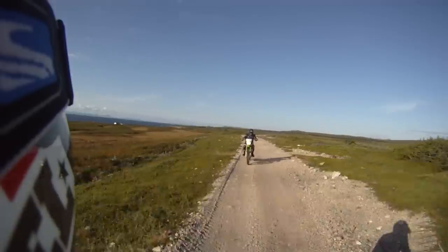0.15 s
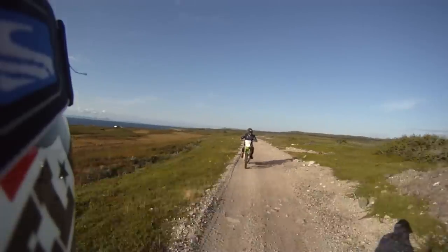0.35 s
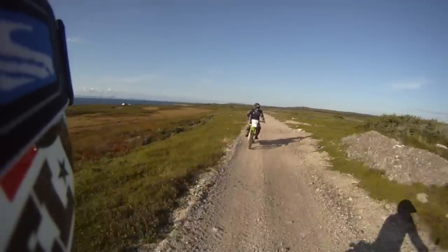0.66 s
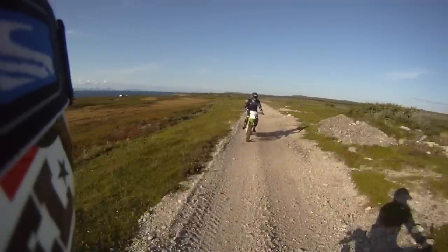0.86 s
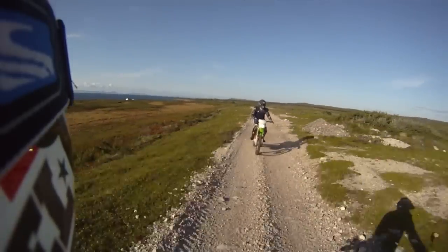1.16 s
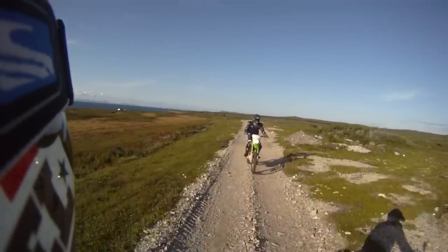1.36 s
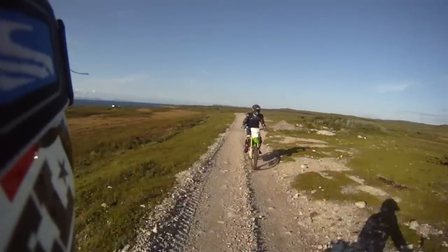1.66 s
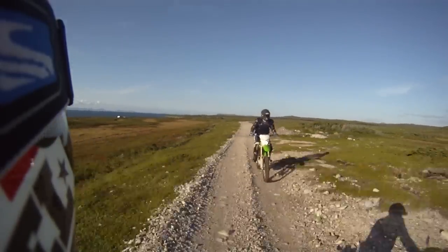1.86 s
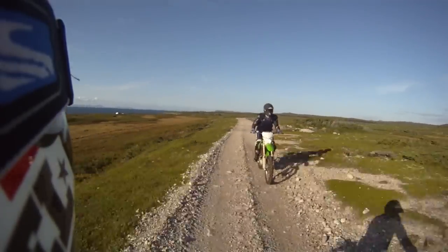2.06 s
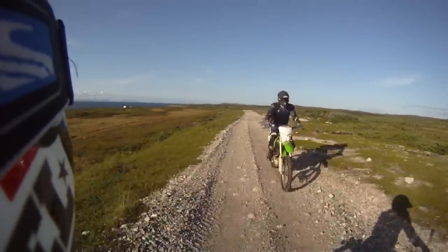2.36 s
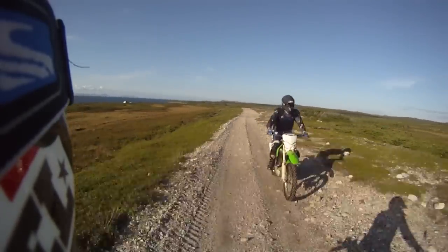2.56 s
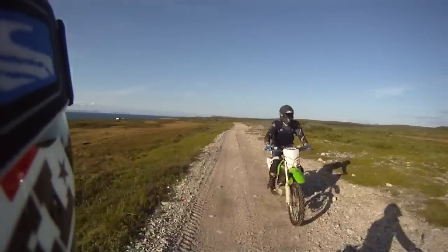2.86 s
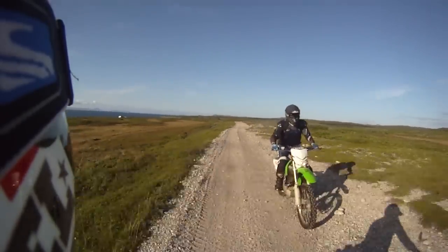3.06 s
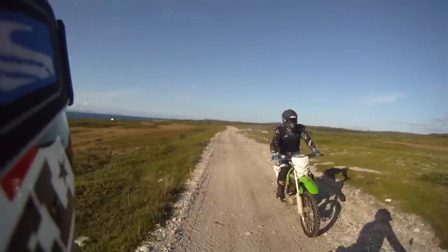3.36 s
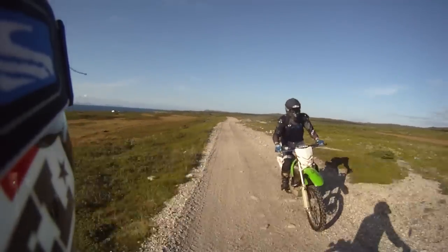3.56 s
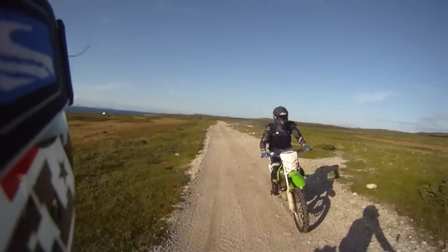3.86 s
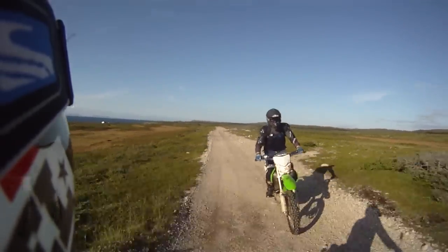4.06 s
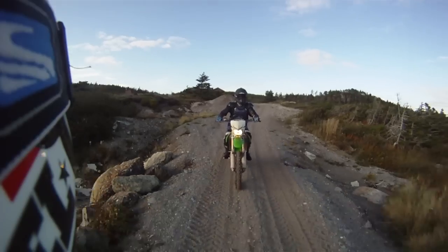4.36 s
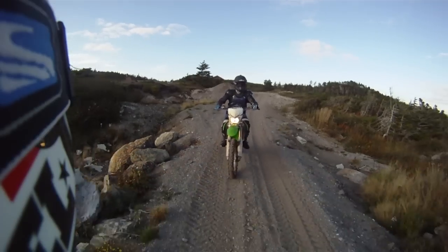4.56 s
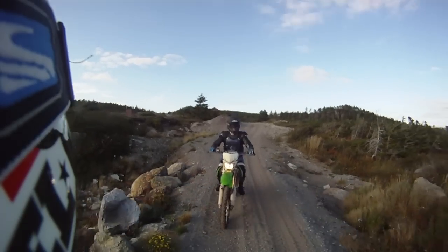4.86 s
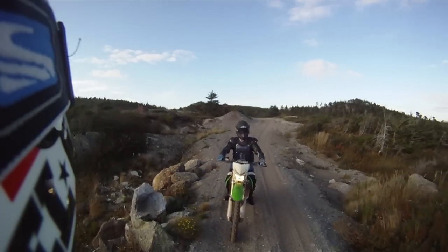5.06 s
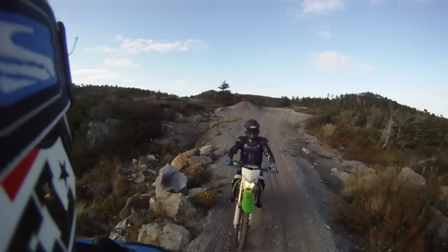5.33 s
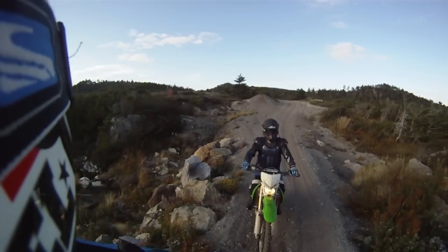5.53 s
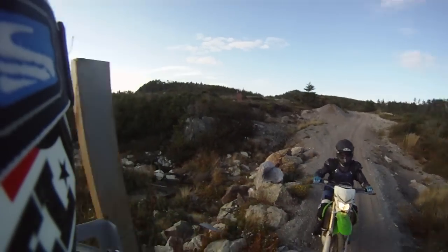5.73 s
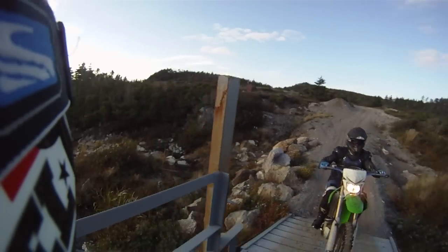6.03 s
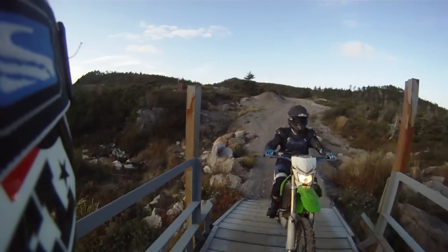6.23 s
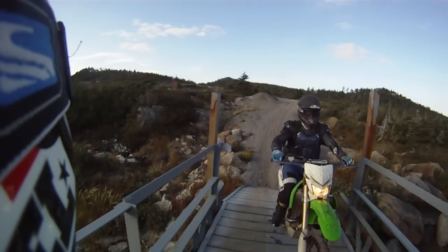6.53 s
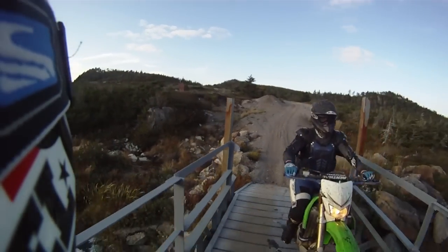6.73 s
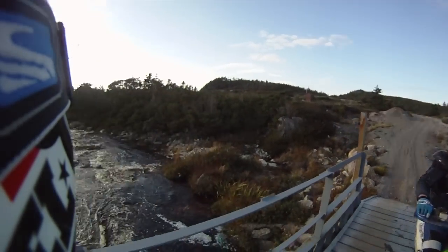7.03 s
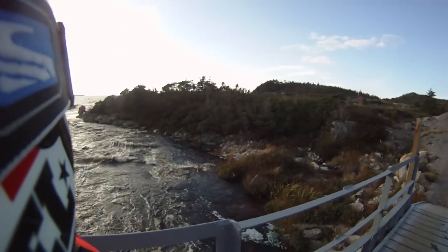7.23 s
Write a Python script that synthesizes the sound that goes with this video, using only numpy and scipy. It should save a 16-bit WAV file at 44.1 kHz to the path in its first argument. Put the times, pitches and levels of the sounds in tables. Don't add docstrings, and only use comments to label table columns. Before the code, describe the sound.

Outdoors, from a camera on a rider's helmet in a sealed plastic housing. Loud lumpy wind, hiss and low buffeting cover a steady blurred dirt bike drone for four seconds, fading to a brief silence. Then a much quieter slow ride fades in: separate exhaust thumps, metallic ticks, light gravel knocks, then throttle blips and sharp clattering knocks on a plank bridge.

```python
import sys
import numpy as np
from scipy import signal
from scipy.fft import rfft, irfft, next_fast_len
from scipy.io import wavfile
from scipy.ndimage import uniform_filter1d

SR = 44100
rng = np.random.default_rng(int(sys.argv[2]) if len(sys.argv) > 2 else 0)


def nominal_scale(level):
    x = np.asarray(level, float) / 20
    return 10 ** x


def inscribe(sig):
    pcm = np.round(np.clip(np.atleast_2d(sig).T, -1, 1) * 32767)
    wavfile.write(sys.argv[1], SR, pcm.astype(np.int16))


N = 325898
T = np.arange(N) / SR
CUT = 4.162
PLANKS_S = (5.54, 5.8)


def evened(x):
    return x / np.sqrt(np.mean(x ** 2) + 1e-20)


def curves(rows):
    s, *columns = np.transpose(rows)
    return [np.interp(T, s, c) for c in columns]


def held(rows, settle_s=0.028):
    s, *columns = np.transpose(rows)
    row = np.maximum(np.searchsorted(s, T) - 1, 0)
    return [uniform_filter1d(c[row], round(settle_s * SR)) for c in columns]


def spell(start, length, rise, fall):
    opening = (T - start) / rise + 0.5
    closing = (start + length - T) / fall + 0.5
    return np.clip(np.minimum(opening, closing), 0, 1)


def dying(x, decay_s):
    return signal.lfilter([1], [1, -np.exp(-1 / (decay_s * SR))], x)


def ring(x, hz, width):
    radius = np.exp(-np.pi * width / SR)
    angle = 2 * np.pi * hz / SR
    return signal.lfilter([0.5, 0, -0.5], [1, -2 * radius * np.cos(angle), radius ** 2], x)


def drift(per_s, count=64):
    coarse = rng.standard_normal(N // count + 2)
    coarse = uniform_filter1d(coarse, max(int(SR / count / per_s / 4), 1))
    coarse = evened(signal.lfilter([1], [1, -np.exp(-2 * np.pi * per_s * count / SR)], coarse))
    return np.interp(np.arange(N) / count, np.arange(len(coarse)), coarse)


def coloured(x, points, peaks=()):
    size = next_fast_len(N)
    hz = np.fft.rfftfreq(size, 1 / SR)
    f, db = np.transpose(points)
    gain = nominal_scale(np.interp(np.log(hz + 1), np.log(f), db)) * (hz > f[0]) * (hz < f[-1])
    for centre, width, over_db in peaks:
        gain = gain * nominal_scale(over_db / (1 + (2 * (hz - centre) / width) ** 2))
    droop = np.sinc(np.minimum(hz, 6000) / 12000)
    return evened(irfft(rfft(x, size) * gain / droop, size)[:N])


# time in seconds, firings per second.
FAST_FIRINGS = [(0.0, 47.8), (0.6, 47.5), (0.9, 45.9), (1.5, 45.8), (1.8, 44.9), (2.4, 45.7), (2.7, 45.4),
                (3.0, 43.6), (4.16, 42.9)]
# multiple of the firing rate, level in dB against the low wind.
DRONE_ORDERS = [(2, -8), (3, -14), (4, -10.5), (5, -13.5), (6, -13), (7, -25.5), (9, -22), (11, -17)]


def drone():
    turns = np.cumsum(curves(FAST_FIRINGS)[0]) / SR + 0.014 * drift(5.1)
    out = np.zeros(N)
    for order, db in DRONE_ORDERS:
        tone = np.cos(2 * np.pi * (order * turns + rng.random()))
        out += nominal_scale(db + 3.5 * drift(3.1)) * np.sqrt(2) * tone
    return out


# frequency in Hz, level in dB per Hz.
WIND_COLOUR = [(32, -52), (55, -3), (65, -0.5), (91, -2), (118, 0), (276, -9), (376, -15), (480, -16.5),
               (620, -26), (1060, -120)]


def wind(db, gust_db):
    return nominal_scale(db) * coloured(rng.standard_normal(N) * nominal_scale(gust_db * drift(19.0)), WIND_COLOUR)


# frequency in Hz, width in Hz, height in dB over the hiss
# on the fast ride, the same on the slow ride, level in dB when knocked.
HOUSING_MODES = [(740, 110, 5, 2.1, 7), (1007, 23, 2.5, 1.4, -2.5), (1280, 83, 5.5, 4.1, 7.5),
                 (1830, 320, 0, 1.7, 15.5), (2196, 39, -2.5, 2, 3.5), (2126, 200, 6, 4.5, -53),
                 (2382, 158, 6.5, 2.5, -38), (2910, 150, 1.5, 3.4, -3), (3640, 110, 3.5, 5.1, -46)]


def housing_hiss(db, colour, column, throb, gust_db, patch_db, grit):
    stones = (rng.random(N) < 40 / SR) * nominal_scale(5.2 * np.minimum(rng.exponential(1, N), 3))
    shakes = grit * dying(stones, 0.002)
    drive = rng.standard_normal(N) * nominal_scale(gust_db * (drift(6.8) + drift(60))) * (1 + throb + shakes)
    z = signal.stft(drive, nperseg=256)[2]
    patches = uniform_filter1d(rng.standard_normal(z.shape), 3, 0)
    patches = evened(uniform_filter1d(patches, 8, 1))
    drive = signal.istft(z * nominal_scale(patch_db * patches), nperseg=256)[1][:N]
    return nominal_scale(db) * coloured(drive, colour, [(row[0], row[1], row[column]) for row in HOUSING_MODES])


# frequency in Hz, level in dB per Hz.
FAST_HISS_COLOUR = [(240, -5.5), (400, -10.5), (581, -8.5), (713, -1.5), (845, -6.5), (1000, -3.5),
                    (1130, -6.5), (1290, -7), (1670, -7), (2140, -3), (2810, -12.5), (3690, -11),
                    (4220, -19), (5240, -21), (6000, -26), (7800, -72), (13200, -120)]
# time in seconds, hiss level in dB, turn of the head in dB under 1.4 kHz.
HEAD_AIRFLOW = [(0.0, -16, .5), (0.3, -22.5, .5), (0.6, -20, -2), (0.8, -19.5, 2.5), (1.4, -22.5, 2),
                (1.7, -22.5, -0.9), (2.2, -22.5, -0.5), (2.55, -20, 1), (2.95, -22.5, 0.6),
                (3.25, -22.5, -2.2), (4.1, -24, -1.5)]
# start in seconds, length in seconds, low wind up in dB, hiss up in dB.
FAST_GUSTS = [(0.0, 0.11, 3, -2.5), (0.17, 0.19, 4, -0.7), (0.333, .07, -2, 3), (0.46, 0.054, 7, 1.3),
              (0.586, 0.044, 2, .6), (0.717, 0.084, 6, 1), (0.88, 0.055, 4.5, .6), (1.0, 0.29, 2, 0.65),
              (1.209, 0.064, 8, 0), (1.295, 0.036, 7, 5), (1.413, .12, 6.5, 3), (1.623, 0.034, 3, 1),
              (1.818, 0.16, 3, 1.5), (2.236, 0.056, 3.5, 0.2), (2.416, 0.031, 10, 4.5),
              (2.568, 0.24, 3.5, 1.1), (2.862, 0.2, 4, 3.5), (3.034, 0.28, 2.5, 2.5), (3.354, 0.13, 2, 2.5)]


def fast_ride():
    air_db, dark_db = curves(HEAD_AIRFLOW)
    low_up_db, hiss_up_db = sum(np.outer(up_db, spell(s, length, rise=0.016, fall=0.15))
                                for s, length, *up_db in FAST_GUSTS)
    usual_db = air_db.mean()
    wind_db = usual_db + 0.42 * (air_db - usual_db) - 6.5 + low_up_db
    low = nominal_scale(uniform_filter1d(wind_db, 12000)) * drone() + wind(wind_db - 0.5, gust_db=-1.5)
    hiss = housing_hiss(air_db + hiss_up_db, FAST_HISS_COLOUR, column=2, throb=0,
                        gust_db=0.66, patch_db=0.5, grit=0.052)
    dark = signal.sosfiltfilt(signal.butter(2, 1400, fs=SR, output="sos"), hiss)
    return low + hiss + (nominal_scale(dark_db) - 1) * dark


# start in seconds, length in seconds, level in dB,
# pitch in Hz.
HELMET_SHAKES = [(0.05, 0.18, -21.5, 40.77), (0.275, 0.11, -22.5, 35), (0.4, 0.3, -23, 33.4),
                 (0.847, 0.25, -28, 35.5), (1.19, 0.065, -24, 36.1), (1.298, 0.3, -27, 36.86),
                 (1.665, 0.04, -20, 36.75), (1.796, 0.053, -19, 37.45), (1.904, 0.16, -23, 38.5),
                 (2.203, 0.26, -28, 40.76), (2.496, 0.25, -26.5, 44), (2.82, 0.18, -22.5, 39.6),
                 (3.03, 0.24, -28, 40.57), (3.278, 0.32, -26.5, 36.66), (3.64, 0.33, -25.5, 38.05),
                 (4.0, 0.46, -34.5, 42.1), (4.42, 0.32, -33, 38.6), (4.81, 0.15, -38, 40.3),
                 (4.96, 0.12, -32.5, 40.8), (5.13, 0.22, -29.5, 36.6), (5.34, .18, -38, 37.6),
                 (5.61, 0.135, -35, 37.4), (5.764, 0.25, -34, 40.6), (6.1, .18, -42, 39.9),
                 (6.393, .2, -46, 36), (6.65, 0.126, -39, 46.5), (6.807, 0.28, -40, 40.2),
                 (7.198, 0.24, -40, 40)]


def buffet(wobble=0.12, lumps_db=1.8):
    size = nominal_scale(np.where(T < CUT, -46, -56))
    for s, length, db, _ in HELMET_SHAKES:
        size = size + nominal_scale(db) * spell(s, length, rise=0.019, fall=0.044)
    hz = curves([(s + length / 2, f) for s, length, _, f in HELMET_SHAKES])[0]
    turns = np.cumsum(hz * (1 + wobble * drift(12.8))) / SR
    return np.sqrt(2) * size * nominal_scale(lumps_db * drift(20) - 3.3) * np.sin(2 * np.pi * turns)


# time in seconds, firings per second.
SLOW_FIRINGS = [(4.162, 24.71), (4.5, 25.86), (4.9, 26.02), (5.0, 19.64), (5.3, 17.24), (5.7, 19.15),
                (5.87, 18.85), (6.1, 28.32), (6.22, 27.5), (6.32, 32.91), (6.5, 24.47), (6.66, 22.32),
                (6.76, 26.73), (6.88, 29.81), (7.1, 26.67), (7.39, 32.35)]


def firings(start, uneven_db):
    per_s = curves(SLOW_FIRINGS)[0]
    turns = start + np.cumsum(per_s * (T > CUT)) / SR + 0.008 * drift(20)
    clicks = np.diff(np.maximum.accumulate(np.floor(turns)), prepend=0)
    return clicks * nominal_scale(uneven_db * rng.standard_normal(N)) / np.sqrt(per_s), turns


# frequency in Hz, width in Hz, level in dB.
SILENCER_MODES = [
    (101.7, 54, 17),
    (144, 48, -5),
]
# frequency in Hz, width in Hz, level in dB.
PIPE_END_MODES = [
    (260, 170, 0),
    (480, 150, -5),
]


def exhaust(clicks, thump_db, bark_db, throttle, lag_s=0.0066, first=0.3):
    lower, upper = [nominal_scale(db) * ring(ring(clicks, hz, width), hz, width) for hz, width, db in SILENCER_MODES]
    thump = lower + upper * nominal_scale(np.interp(throttle, [0, 1], (-16, 12)))
    snap = signal.oaconvolve(clicks, signal.windows.hann(91))[:N]
    snap = first * snap + np.roll(snap, round(lag_s * SR))
    bark = sum(nominal_scale(db + 1.1 * drift(11)) * evened(ring(snap, hz, width)) for hz, width, db in PIPE_END_MODES)
    later = T > CUT
    return -nominal_scale(thump_db) * thump / np.std(thump[later]) - nominal_scale(bark_db) * bark / np.std(bark[later])


def pipe_hum(turns, load_db, throttle):
    pipe_hz, width_hz = 110, 69
    off_pipe = np.minimum(((4 * curves(SLOW_FIRINGS)[0] - pipe_hz) / width_hz) ** 2, 1)
    db = load_db - 9.5 - 3.5 * throttle - 24 * off_pipe + np.interp(T, PLANKS_S, [-6, 0])
    return nominal_scale(db + 0.5) * np.sqrt(2) * np.cos(2 * np.pi * (4 * turns - 0.52))


# frequency in Hz, width in Hz, level in dB.
VALVE_MODES = [
    (2940, 150, 1.5),
    (2200, 246, 4),
    (3460, 300, -12),
]


def valve_ticks(clicks):
    burst = dying(clicks * nominal_scale(2.5 * drift(20)), 0.01) * rng.standard_normal(N)
    sound = sum(nominal_scale(db) * ring(burst, hz, width) for hz, width, db in VALVE_MODES)
    return nominal_scale(-53.5) * evened(sound) * spell(CUT, 4.95 - CUT, rise=0.01, fall=0.17)


# time in seconds, peak in dB, loudest ring in Hz, shake in seconds.
WHEEL_KNOCKS = [(4.7411, -29, 2290, 0.009), (4.7785, -31, 764, 0.009), (4.8429, -27, 1240, 0.0072),
                (4.9344, -30, 996, 0.02), (5.5832, -27, 2050, 0.014), (5.6765, -24, 1270, 0.0067),
                (5.7618, -20, 1280, 0.0067), (5.8456, -29, 2770, 0.009), (6.0072, -16, 1920, 0.0067),
                (6.0901, -11, 2280, 0.0064), (6.1034, -15, 1290, 0.0049), (6.1355, -19, 1270, 0.017),
                (6.1729, -19, 1280, 0.02), (6.4123, -20, 2040, 0.015), (6.552, -19.5, 1260, 0.0068),
                (6.6049, -7, 1830, 0.0085), (6.6164, -16, 2180, 0.0079), (6.628, -20, 2210, 0.013),
                (6.6494, -28, 2240, 0.0074), (6.771, -26, 2970, 0.0058), (6.8084, -22, 740, 0.013),
                (6.8444, -27, 600, 0.0083), (6.8942, -17, 1130, 0.025), (6.9686, -19, 2100, 0.021),
                (7.0174, -26, 1310, 0.009), (7.1272, -40, 1300, 0.009), (7.3372, -18.5, 1220, 0.0082)]


def knocks(favour_db=9, trim_db=-3, dull_hz=2700):
    out, t = np.zeros(N + 5000), np.arange(5000) / SR
    padding = signal.butter(2, dull_hz, fs=SR)
    for s, db, loudest_hz, shake in WHEEL_KNOCKS:
        noise = np.where(t < 0.0003, 2.5, rng.standard_normal(5000))
        envelope = np.exp(-t / max(shake, 0.001)) * np.minimum(t / 0.00047, 1)
        jolt = signal.lfilter(*padding, noise * envelope)
        sound = np.zeros(5000)
        for hz, width, _, _, knock_db in HOUSING_MODES:
            nearness_db = favour_db / (1 + ((hz - loudest_hz) / 120) ** 2)
            sound += nominal_scale(knock_db + nearness_db) * ring(jolt, hz, width)
        out[round(s * SR):][:5000] += nominal_scale(db + trim_db) * sound / abs(sound).max()
    return out[:N]


# time in seconds, peak in dB, pitch in Hz.
FRAME_BOOMS = [(4.774, -27, 320), (4.855, -26, 330), (4.895, -31, 326), (5.581, -30, 175), (5.68, -34, 175),
               (5.684, -35, 330), (6.14, -28, 327), (6.172, -37, 300), (6.605, -29, 397), (6.61, -27, 200),
               (6.772, -25, 246), (6.809, -24, 270), (6.843, -24.5, 280), (6.773, -28.5, 2970),
               (5.846, -34, 2770), (6.615, -26, 725), (6.092, -33, 563), (6.975, -33, 340)]


def booms(rise_s=0.002, ring_s=0.011):
    out, t = np.zeros(N + 4000), np.arange(4000) / SR
    envelope = np.minimum(t / rise_s, 1) * np.exp(-t / ring_s)
    for s, db, hz in FRAME_BOOMS:
        out[round(s * SR):][:4000] -= nominal_scale(db) * envelope * np.sin(2 * np.pi * hz * t)
    return out[:N]


def buckle_rattle():
    hz, width, scrapes_per_s, db = 3556.5, 119, 142, -48.5
    touches = (rng.random(N) < scrapes_per_s / SR) * nominal_scale(1.8 * rng.standard_normal(N))
    scrapes = dying(touches, 0.0032) * rng.standard_normal(N)
    return nominal_scale(db) * evened(ring(ring(scrapes, hz, width), hz, width)) * np.clip((T - 5.4) / 0.53, 0, 1)


# frequency in Hz, level in dB per Hz.
SLOW_HISS_COLOUR = [(360, -18), (620, -1), (898, -6), (1250, -3), (1430, -9), (1920, -8), (2130, -4.5),
                    (2500, -9.5), (3270, -13), (3630, -12), (4180, -19.5), (5350, -17), (6000, -23.5),
                    (7800, -65), (13200, -120)]
# time in seconds, load in dB, throttle from 0 to 1.
RIDER_HAND = [(4.162, -31, 0.42), (4.45, -31.5, 0.4), (4.72, -34, 0.48), (4.97, -50, 0.4), (5.12, -30.5, 0),
              (5.3, -32.5, .02), (5.53, -29.5, 0.17), (5.74, -34, 0.34), (5.87, -32.5, 0.1),
              (6.0, -40, 0.78), (6.2, -36.5, 0.47), (6.33, -26.5, 0.4), (6.47, -29, 0.39),
              (6.65, -37, 0.65), (6.76, -33.5, 0.74), (6.88, -30.5, 0.53), (7.06, -34, 0.67),
              (7.14, -37.5, 0.97)]


def slow_ride():
    load_db, throttle = held(RIDER_HAND)
    clicks, turns = firings(start=0.32, uneven_db=1.2)
    bark_db = load_db - 23 + 24.5 * throttle
    engine = exhaust(clicks, load_db - 5.5, bark_db + 0.32, throttle) + pipe_hum(turns, load_db, throttle)
    puffs = spell(5.6, 0.72, rise=0.09, fall=0.27) + spell(6.35, 0.15, rise=0.09, fall=0.27)
    breeze = wind(-41.5 + 5.5 * puffs + 0.5, gust_db=0.0)
    throb = np.interp(T, [4.9, 5.3], [0.7, 0.5]) * nominal_scale(3 * drift(12)) * np.exp(-((turns - 0.1) % 1) / 0.15)
    tyre_db = np.interp(T, PLANKS_S, [-42.5, -37.5]) + 0.76
    hiss = housing_hiss(tyre_db, SLOW_HISS_COLOUR, column=3, throb=throb,
                        gust_db=0.77, patch_db=1.0, grit=0.04)
    return engine + breeze + hiss + valve_ticks(clicks) + knocks() + booms() + buckle_rattle()


def scene():
    away_s = abs(T - CUT)
    fade = np.minimum(away_s / 1.0, 1) * np.minimum(away_s / 0.024, 1) ** 0.3
    ride = np.where(T < CUT, fast_ride(), slow_ride())
    return (fade * (ride + buffet()))[None]


def band_limit(x):
    return signal.sosfilt(signal.butter(12, 15630, fs=SR, output="sos"), x)


# lower edge in Hz, loudness needed in dB.
LOUD_ONLY_TREBLE = [
    (14420, -38),
    (15130, -14.8),
]


def record(dry):
    guarded = signal.sosfilt(signal.butter(12, 5650, fs=SR, output="sos"), dry)
    sampled = signal.resample_poly(guarded, 40, 147, axis=1)
    steps = np.repeat(sampled, 4, axis=1)
    mirrored = signal.resample_poly(steps, 147, 160, axis=1)
    hz, t, z = signal.stft(mirrored, SR, nperseg=2048)
    moment_db = 10 * np.log10((abs(z[0]) ** 2).sum(0) + 1e-12) + 1.5 * rng.standard_normal(len(t))
    for edge_hz, needed_db in LOUD_ONLY_TREBLE:
        z = z * ~((hz[:, None] > edge_hz) & (moment_db < needed_db))
    mix = signal.istft(z, SR, nperseg=2048)[1][:, :N]
    return band_limit(mix)


dry = scene()
out = record(dry)
inscribe(out)
```